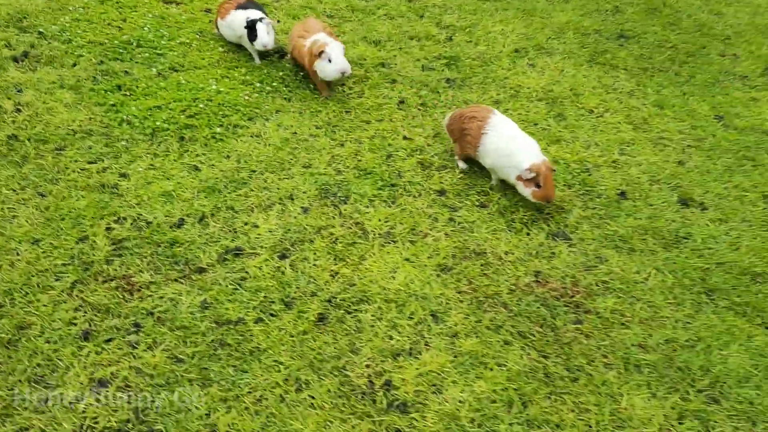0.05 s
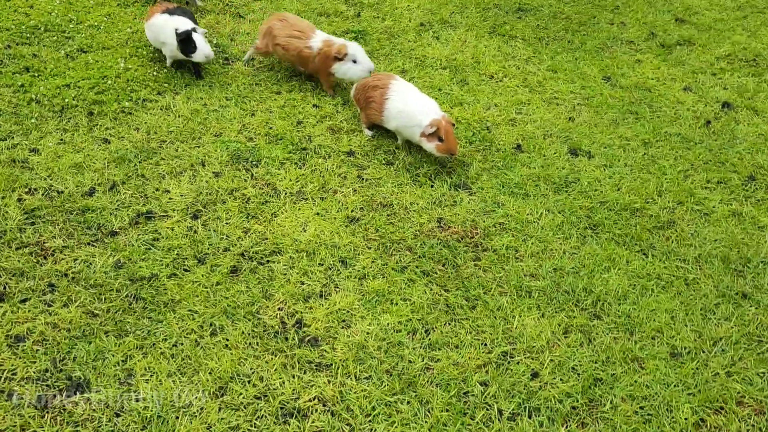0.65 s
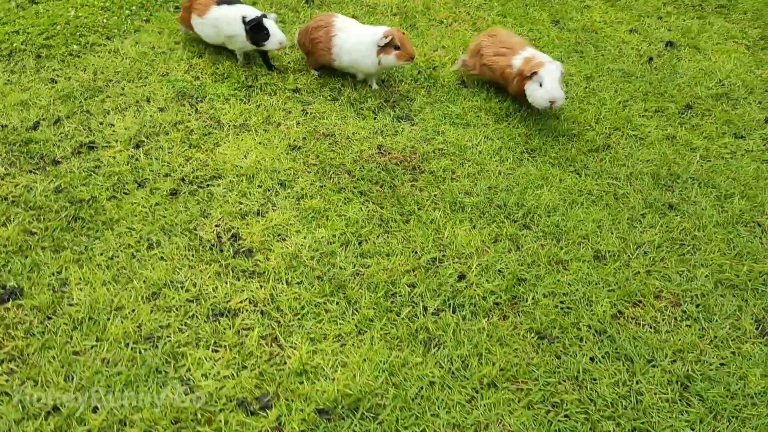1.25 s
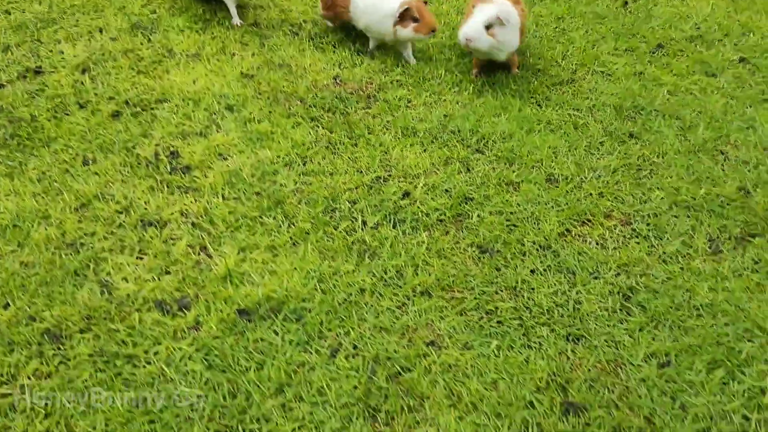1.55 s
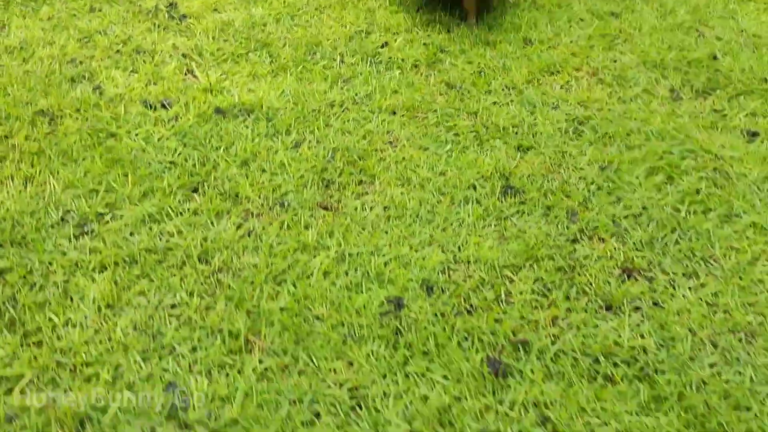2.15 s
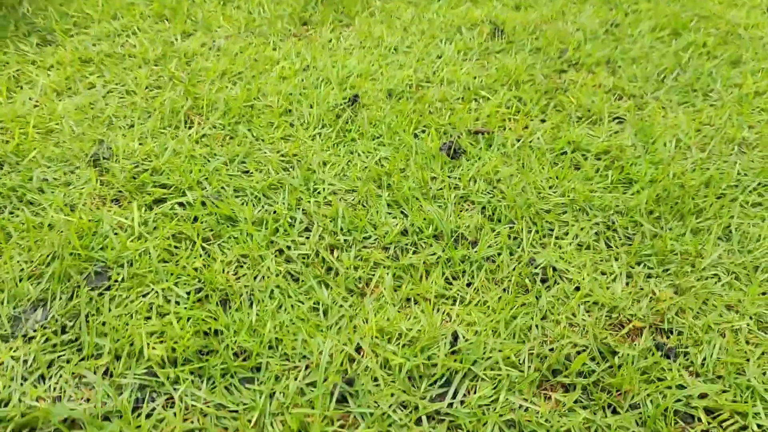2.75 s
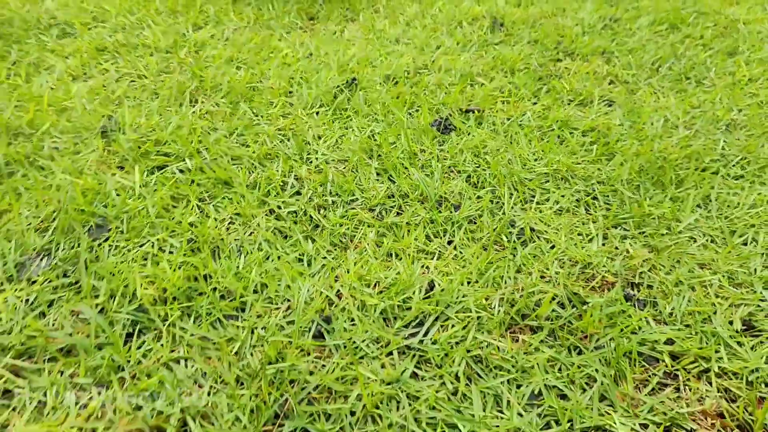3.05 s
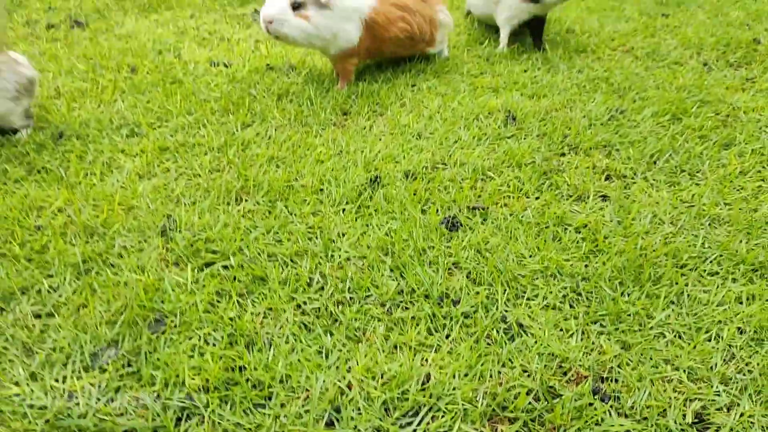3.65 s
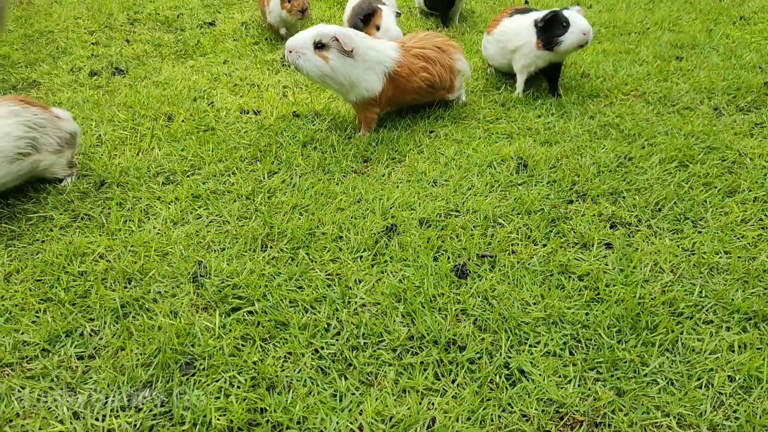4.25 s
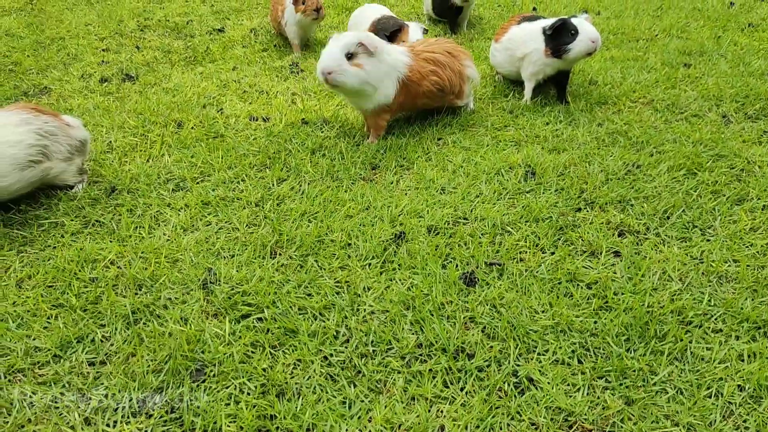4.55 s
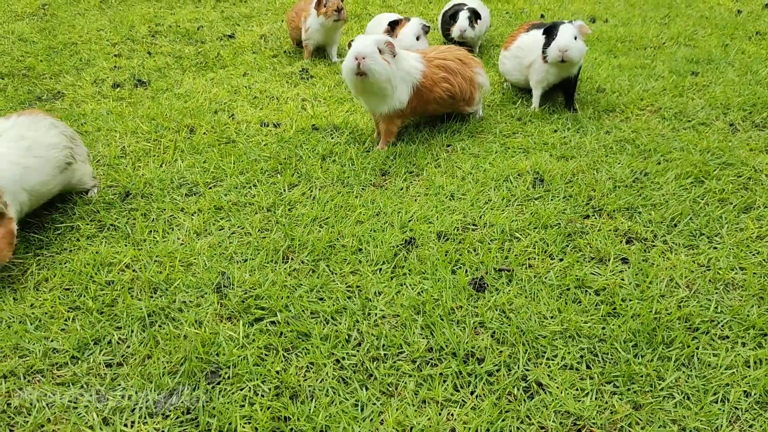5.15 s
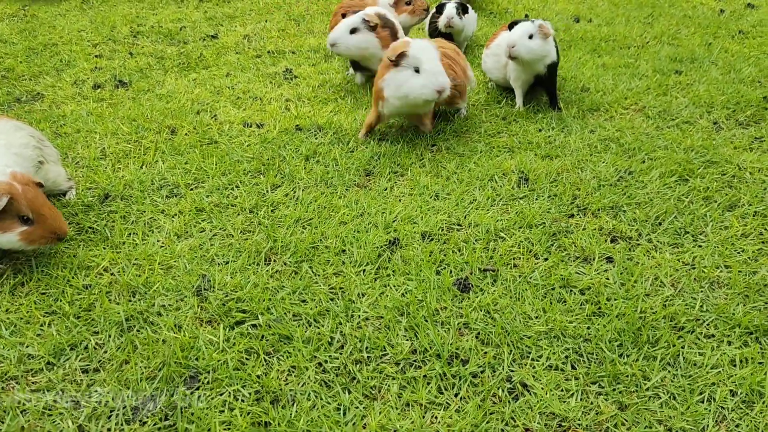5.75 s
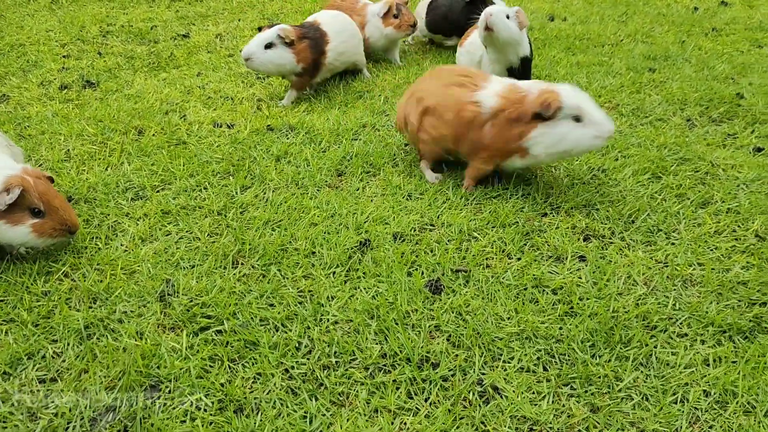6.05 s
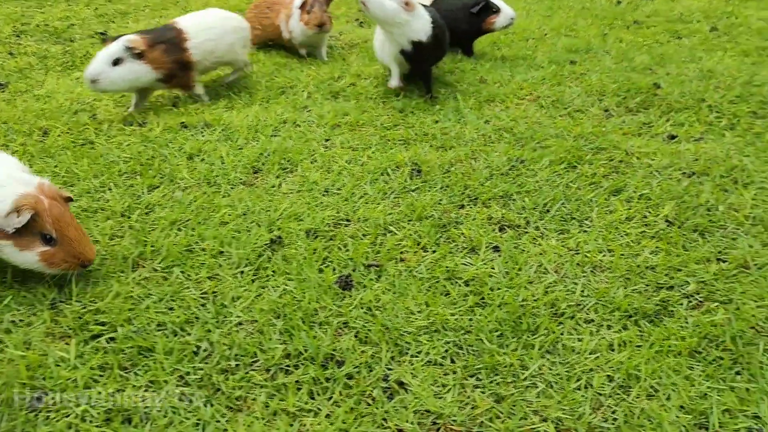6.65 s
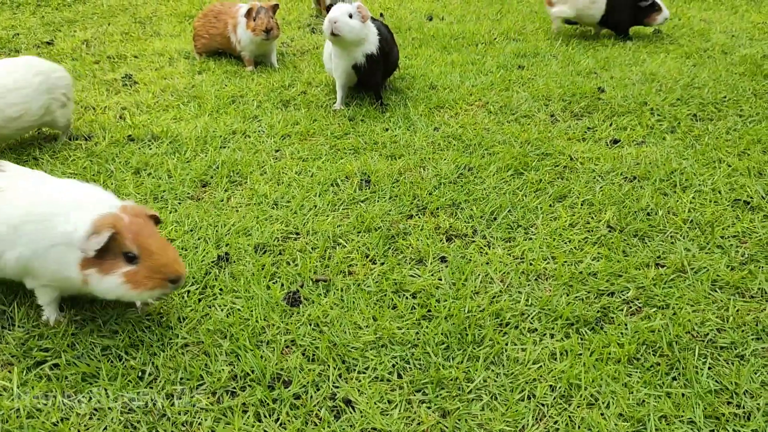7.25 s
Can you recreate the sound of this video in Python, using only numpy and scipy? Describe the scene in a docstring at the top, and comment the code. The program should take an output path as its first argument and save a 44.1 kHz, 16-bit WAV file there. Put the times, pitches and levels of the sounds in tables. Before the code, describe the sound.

In a yard with a faint, wavering machine hum, dry pellets rattle in a quick rhythm inside a plastic tub near the microphone. After about two seconds the tub is tipped and the pellets are stirred, with scattered clicks and hollow knocks. Short guinea pig squeaks and thin bird whistles echo lightly from a distance. A dull bump ends the handling, and grass rustles softly as the animals scurry over the lawn.

```python
"""A dry rattle, close by: a plastic tub of feed pellets is shaken about six times a second, then tipped
and rummaged, to call guinea pigs over a lawn. The pellets crackle on each other and drum on the hollow
tub, and fine pellet dust slides with a brief bright hiss. Raspy squeaks and thin bird whistles echo in
the yard, the grass hisses near the end as the animals run, and a low machine hum wavers under the air."""
import sys
import numpy as np
from scipy import signal
from scipy.fft import rfft, irfft
from scipy.io import wavfile
from scipy.ndimage import uniform_filter1d, minimum_filter1d

SR = 44100
rng = np.random.default_rng(int(sys.argv[2]) if len(sys.argv) > 2 else 0)


def log_audio(samples):
    """Write samples as a 16-bit WAV file to the path given in sys.argv[1]."""
    # one column per channel
    frames = np.atleast_2d(samples).T
    # limit to full scale, then quantise
    limited = np.clip(frames, -1, 1)
    pcm = np.round(limited * 32767).astype(np.int16)
    wavfile.write(sys.argv[1], SR, pcm)


N = 326781
T = np.arange(N) / SR

# Tone of the outdoor air. Each row: frequency in Hz, relative level in dB.
AIR_COLOUR = [(20, -9), (36, -4), (60, -8), (90, -4.5), (180, -9), (280, -19), (500, -22.5), (1350, -36.5),
              (2300, -27), (3100, -32), (4100, -31), (5800, -33.5), (7100, -28), (7700, -33), (8400, -27.5),
              (11000, -46), (15500, -56)]
# Fader ride of the machine hum. Each row: time in seconds, level in dB.
HUM_RIDE = [(0.0, -38.5), (0.31, -35), (1.5, -39), (1.81, -49), (2.18, -36), (2.92, -55.5), (3.01, -42),
            (3.26, -46), (3.38, -36.5), (3.98, -37.5), (4.04, -49.5), (4.59, -38), (5.56, -52.5),
            (5.61, -39.5), (7.4, -46.5)]
# Tone of sliding dust and brushed grass. Each row: frequency in Hz, relative level in dB.
HISS_COLOUR = [(1000, -27.5), (2000, -6.5), (3200, 3), (4400, 3), (6000, -0.5), (7000, -5.5), (8400, 3.5),
               (10000, -12), (12000, -14), (14000, -31)]
# Bright hisses: the first two are fine pellet dust sliding in the tub, the last two are runs through
# the grass. Each row: start and length in seconds, level in dB.
HISSES = [(2.345, 0.038, -32.5), (2.434, 0.26, -46.5), (6.248, 0.236, -47), (6.498, 0.5716, -37)]
# Bird whistles. Each row: start and length in seconds, start, middle and end pitch in Hz, level in dB.
BIRD_NOTES = [(2.801, 0.098, 5310, 6040, 6420, -43.5), (3.304, 0.0306, 3227, 2922, 2630, -42.5),
              (3.406, 0.046, 2707, 2744, 2746, -46), (3.816, 0.063, 5370, 6020, 6570, -42),
              (5.461, 0.02, 5380, 5860, 6080, -40.5), (5.62, 0.0633, 3850, 3830, 3664, -38.5),
              (5.697, 0.036, 5270, 5030, 4610, -44), (5.891, 0.0784, 5104, 4705, 4735, -44),
              (6.067, 0.053, 5000, 4850, 4015, -40.5), (6.312, 0.064, 5350, 4993, 4890, -40),
              (6.886, 0.083, 5900, 5764, 5860, -39.5)]
# Raspy squeaks. Each row: start and length in seconds, start and end pitch in Hz, level in dB.
SQUEAK_NOTES = [(2.858, 0.0758, 3136, 3118, -28), (2.934, 0.0837, 3260, 3504, -34),
                (3.809, 0.0495, 4576, 3788, -36), (3.849, 0.074, 3018, 3147, -30.5),
                (4.634, 0.0374, 3900, 3934, -40), (4.814, 0.0742, 3066, 3229, -31),
                (4.918, 0.0425, 3910, 3990, -41), (6.019, 0.023, 3243, 2670, -44),
                (6.199, 0.0293, 3990, 3845, -43.5), (6.779, 0.083, 3196, 3098, -31.5),
                (7.348, 0.082, 3090, 2990, -47)]
# Dull hand bumps on the tub. Each row: start in seconds, pitch in Hz, decay in seconds, level in dB.
HAND_BUMPS = [(5.652, 494.3, 0.0063, -17.5), (5.956, 535, 0.00596, -31.5), (6.028, 199, 0.0105, -27)]
# A soft creak of the plastic. Each row: start and length in seconds, pitch in Hz, level in dB.
TUB_CREAKS = [(2.353, 0.08, 640.6, -44.5)]
# How the tub is held. Each row: time and right-channel lag in seconds, open-mouth tone in dB.
TUB_POSE = [(0, 0.0002168, 2.5), (0.801, 0.000141, -55.5), (1.3, 0.0002834, -3), (2.0, 0.000236, -1.5),
            (3.1, 0.0003, 6), (4.2, .00037, -9), (5.2, 0.0002124, 2)]
# Resonances of the tub. Each row: frequency and bandwidth in Hz, relative level in dB.
TUB_MODES = [(394.7, 43.9, 0), (422.5, 45, 1), (493.7, 70.6, 4.5), (625, 34.8, -4), (781.7, 57.4, -5),
             (1062.8, 66, -12), (2007, 143, -13), (2422, 727, -11.5)]
# Tone of pellet on pellet. Each row: frequency in Hz, relative level in dB.
CRACKLE_COLOUR = [(300, -23.5), (600, 2.5), (1000, -1.5), (1400, -0.5), (1750, 3.5), (2100, 1.5), (2500, 3),
                  (3600, 1), (4600, -0.5), (6400, -5), (8400, 1.5), (9600, -9), (12300, -23), (15500, -29)]
# Shakes. Each row: landing time and flight in seconds, strength of the throw and its lead-in slide in dB.
TUB_SHAKES = [(0.107, 0.0209, -10.5, -32), (0.284, 0.0242, -11.5, -20), (.452, 0.0267, -11.5, -16.5),
              (0.597, 0.0217, -9, -22), (0.76, 0.021, -10.5, -22.5), (0.924, 0.01755, -4, -27.5),
              (1.119, 0.0189, -8.5, -19.5), (1.305, 0.0363, -13.5, -25), (1.482, 0.0241, -20, -27),
              (1.625, 0.0243, -14, -23.5), (1.815, 0.0352, -17, -32), (1.966, 0.0264, -16.5, -23),
              (2.102, 0.0093, -17.5, -27.5), (2.256, 0.0232, -23.5, -29.5)]
# The hand stirs the pellets. Each row: crest time and swell in seconds, strength in dB.
HAND_STIRS = [(2.39, 0.125, -47), (2.554, 0.0344, -37.5), (3.005, 0.015, -42), (3.081, 0.01586, -24),
              (3.208, 0.0876, -43), (3.937, 0.0083, -21.5), (3.97, 0.057, -32), (4.08, 0.0502, -25.5),
              (4.147, 0.0255, -17.5), (4.274, .065, -23), (4.275, 0.0148, -13), (4.426, 0.0343, -35.5),
              (4.68, 0.0864, -45.5), (4.774, 0.0529, -34), (5.097, 0.0535, -24), (5.22, 0.0577, -27.5),
              (5.37, 0.119, -40.5), (5.509, 0.02844, -34.5), (5.64, 0.048, -42.5)]
# Single hard pellet hits. Each row: start in seconds, relative levels of crack and tub knock in dB.
HARD_HITS = [(0.0111, -10, -21), (0.0702, -8.5, -21), (0.1235, 2, -17.5), (0.2538, -14.5, -11),
             (0.5797, 1.5, -28.5), (0.9074, -2.5, -28.5), (0.9408, -0.5, -13.5), (1.0461, -7, -10),
             (1.4782, -2.5, -30.5), (1.6, -10, -28), (2.0857, -13, -19), (2.1104, -9.5, -11.5),
             (2.237, -15, -32), (2.3119, -20, -25.5), (2.5724, -11.5, -20.5), (2.97, -14.5, -49),
             (3.075, -11.5, -20.5), (3.1148, -15, -48), (3.239, -20, -24.5), (4.1259, -11, -20.5),
             (4.1438, 0.5, -17), (4.1801, -15, -19), (4.2764, -3.5, -18.5), (4.3034, -12, -28.5),
             (4.6962, -14, -23.5), (4.8334, -16.5, -42.5), (4.9704, -25.5, -24), (5.0941, -15.5, -15.5),
             (5.2106, -10.5, -25.5), (5.2208, -3, -29), (5.244, -12, -26), (5.4377, -17.5, -40),
             (5.5282, -21.5, -26)]

YARD_DECAY_S = 0.117


def undb(db):
    """Decibels to gain."""
    return 10 ** (np.asarray(db) / 20)


def unit(x):
    """Scale to rms 1."""
    return x / np.sqrt(np.mean(x ** 2))


def pan(db):
    """Channel gains for a left minus right level."""
    return undb(np.array([[db], [-db]]) / 2)


def add(track, start_s, sound):
    """Mix a sound into a track."""
    part = track[int(start_s * SR):][:len(sound)]
    part += sound[:len(part)]


def walk(rate_hz):
    """A smooth random wobble of rms 1."""
    hold = int(SR / rate_hz)
    steps = np.repeat(rng.standard_normal(N // hold + 1), hold)
    return unit(uniform_filter1d(uniform_filter1d(steps, hold), hold)[:N])


def note(length_s):
    """Progress 0-1 through a note, and its rounded envelope."""
    progress = np.linspace(0, 1, int(length_s * SR))
    return progress, np.sqrt(2 * np.abs(np.sin(np.pi * progress)))


def ring(x, response):
    """Pass x through an impulse response scaled to unit energy."""
    response = response / np.sqrt(np.sum(response ** 2, axis=-1, keepdims=True))
    return signal.fftconvolve(np.atleast_2d(x), np.atleast_2d(response), axes=-1)[:, :N]


def colour(x, points, size=1024):
    """Minimum-phase EQ with the given (Hz, dB) outline."""
    hz, db = np.transpose(points)
    gain = undb(np.interp(np.log(np.fft.rfftfreq(size, 1 / SR) + 1), np.log(hz), db))
    cepstrum = irfft(np.log(gain))[:size // 2]
    cepstrum[1:] *= 2
    return ring(x, irfft(np.exp(rfft(cepstrum, size))))


def band(x, centre_hz, width_hz):
    """One resonance, gain 1 at the centre."""
    return signal.lfilter(*signal.iirpeak(centre_hz, centre_hz / width_hz, fs=SR), x)


def flicker(x, centres_hz, rate_hz, depth_db):
    """Let each band rise and fall on its own."""
    for hz in centres_hz:
        gain = undb(depth_db * (walk(rate_hz) - 0.4372))
        x = x + (gain - 1) * band(x, hz, width_hz=hz / 4)
    return x


def echoes(x, decay_s, db):
    """A dense reverb tail, different on each side."""
    t = T[:SR // 2]
    return undb(db) * ring(x, rng.standard_normal((2, len(t))) * np.exp(-t / decay_s))


def far(x):
    """A distant call arrives mostly by way of walls and hedges."""
    return undb(-7) * x + echoes(x, decay_s=.008, db=-5) + echoes(x, YARD_DECAY_S, db=-4.5)


def pose():
    """The tub's right-channel lag in seconds and open-mouth tone in dB, at every sample."""
    times, lag_s, mouth_db = np.transpose(TUB_POSE)
    return np.interp(T, times, lag_s), np.interp(T, times, mouth_db)


def collisions(per_s, spread_db, scatter_s):
    """Random clicks of rms 1; each comes from its own spot, so its stereo lag differs."""
    chance, strength, place = rng.random(N), rng.standard_normal(N), rng.standard_normal(N)
    left = np.flatnonzero(chance < per_s / SR)
    clicks = rng.choice([-1, 1], N)[left] * undb(spread_db * np.minimum(strength[left], 2))
    lag_s, _ = pose()
    lag = np.rint((lag_s + scatter_s * place)[left] * SR).astype(int)
    right = np.clip(left + lag, 0, N - 1)
    return unit(np.array([np.bincount(left, clicks, N), np.bincount(right, clicks, N)]))


def machine_hum(pitch_hz=53):
    """A low machine tone, wavering in pitch and level."""
    phase = 2 * np.pi * np.cumsum(pitch_hz + 0.685 * walk(13)) / SR
    level_db = np.interp(T, *np.transpose(HUM_RIDE)) + 2.66 * walk(12)
    return undb(level_db) * unit(np.sin(phase))


def outdoor_air(level_db=-41.5):
    """A soft bed of noise, narrow in the bass and wide in the treble."""
    mid, side = colour(rng.standard_normal((2, N)), AIR_COLOUR, size=8192)
    side_treble = signal.sosfilt(signal.butter(1, 700, "high", fs=SR, output="sos"), side)
    side = undb(-1) * side_treble + 0.163 * side
    return undb(level_db + 0.91 * walk(3.6)) * np.array([mid + side, mid - side])


def hiss_level(attack_s=0.0345, release_s=0.0572):
    """Each hiss starts quickly, holds and dies away."""
    level = np.zeros(N)
    for start, length, db in HISSES:
        attack = np.clip((T - start) / attack_s, 0, 1)
        release = np.exp(-np.maximum(T - start - length, 0) / release_s)
        level += undb(db) * attack * release
    return level


def dust_and_grass(step_db=-53, steps_from_s=4.2):
    """Countless tiny contacts hiss: first dust sliding in the tub, later grass on fur and scuffing feet."""
    grains = colour(collisions(per_s=6900, spread_db=1, scatter_s=.0004), HISS_COLOUR)
    grains = flicker(grains, np.geomspace(2500, 9000, num=6), rate_hz=30, depth_db=2.6)
    steps = np.maximum(walk(24), 0) ** 2 * (T > steps_from_s)
    scuffs = undb(step_db) * steps * band(grains, centre_hz=3250, width_hz=2300)
    hiss = grains * hiss_level() * undb(2.13 * walk(30))
    return (hiss + scuffs) * pan(-4)


def bird_whistles(waver=0.0185):
    """Far birds: thin, slightly unsteady glides, washed by the yard."""
    out, wobble = np.zeros(N), walk(350)
    for start, length, start_hz, middle_hz, end_hz, db in BIRD_NOTES:
        progress, envelope = note(length)
        hz = np.polyval(np.polyfit([0, .5, 1], [start_hz, middle_hz, end_hz], 2), progress)
        hz *= 1 + waver * wobble[int(start * SR):][:len(hz)]
        add(out, start, undb(db) * envelope * np.sin(2 * np.pi * np.cumsum(hz) / SR))
    return far(out)


def squeaks(trill_hz=48, under_db=-14, over_db=-13):
    """A fast uneven trill roughens each distant squeak; weaker tones sit below and above it."""
    out, rasp = np.zeros(N), walk(600)
    for start, length, start_hz, end_hz, db in SQUEAK_NOTES:
        progress, envelope = note(length)
        trill = np.sin(2 * np.pi * trill_hz * length * progress)
        waver_hz = 120 * trill + 250 * np.roll(rasp, -int(start * SR))[:len(trill)]
        phase = 2 * np.pi * np.cumsum(start_hz + (end_hz - start_hz) * progress + waver_hz) / SR
        tones = np.sin(phase) + undb(under_db) * np.sin(.51 * phase)
        tones += undb(over_db) * np.sin(1.38 * phase)
        add(out, start, undb(db) * envelope * (1 + 0.18 * trill) * tones)
    return far(out)


def handling():
    """The hand bumps the tub, and once the plastic creaks."""
    out, t = np.zeros(N), T[:SR // 8]
    for start, hz, decay_s, db in HAND_BUMPS:
        envelope = 2 * t / decay_s * np.exp(1 - 2 * t / decay_s)
        add(out, start, undb(db) * envelope * np.sin(2 * np.pi * hz * t))
    for start, length, hz, db in TUB_CREAKS:
        _, envelope = note(length)
        phase = 2 * np.pi * np.cumsum(hz * (1 + 0.02 * walk(59)[:len(envelope)])) / SR
        add(out, start, undb(db) * envelope * (np.sin(2 * phase) + 1.19 * np.sin(phase)))
    return out + echoes(out, decay_s=0.0143, db=-17)


def surges(settle_s=0.01901, slide_share=0.542, slide_rise_s=0.0388, slide_fall_s=0.0296):
    """Every move of the pellet mass: stirs, throws and the slides back between throws."""
    moves = [(crest, swell, swell, db) for crest, swell, db in HAND_STIRS]
    previous = 0
    for landing, flight, throw_db, slide_db in TUB_SHAKES:
        slide_crest = previous + slide_share * (landing - previous)
        moves.append((slide_crest, slide_rise_s, slide_fall_s, slide_db))
        moves.append((landing, flight, settle_s, throw_db))
        previous = landing
    return moves


def surge_level(growth, shape):
    """The pellets gather speed, land and settle; growth is dB of level per dB of strength."""
    power = np.zeros(N)
    for crest, rise, fall, db in surges():
        near = slice(max(0, int((crest - 3 * rise) * SR)), int((crest + 3 * fall) * SR))
        t = T[near] - crest
        from_crest = np.abs(t / np.where(t < 0, rise, fall))
        power[near] += undb(growth * db) ** 2 * np.exp(-2 * from_crest ** shape)
    return np.sqrt(power)


def knocks():
    """Each hard hit is one blow on the tub wall, a touch later on the right."""
    out = np.zeros((2, N))
    lag_s, _ = pose()
    for start, _, db in HARD_HITS:
        add(out[0], start, undb([db]))
        add(out[1], start + lag_s[int(start * SR)], undb([db]))
    return out


def drumming(patter_db=-7.5, knock_db=22):
    """Pellets that reach the wall ring the tub, giving the rattle its body."""
    patter = collisions(per_s=1200, spread_db=2, scatter_s=.00006)
    blows = undb(patter_db) * surge_level(growth=0.6618, shape=1.162) * patter
    blows += undb(knock_db) * knocks()
    t = T[:SR // 10]
    body = np.zeros(len(t))
    for k, (hz, width, db) in enumerate(TUB_MODES):
        envelope = undb(db) * width * np.exp(-np.pi * width * t)
        body += (-1) ** k * envelope * np.sin(2 * np.pi * hz * t)  # neighbours swing in opposite senses
    # a small tub radiates little below its lowest mode
    body = signal.sosfilt(signal.butter(4, 270, "high", fs=SR, output="sos"), body)
    return ring(blows, body) * pan(2.15)


def chatter_level(decay_s=.0028):
    """Each hard hit sets off a brief chatter among its neighbours."""
    level, t = np.zeros(N), T[:SR // 20]
    for start, db, _ in HARD_HITS:
        add(level, start, undb(db) * np.exp(-t / decay_s))
    return level


def tub_reflections(clicks, decay_s=.0014, db=-4):
    """Inside the tub every click gets its own short, wide noise tail."""
    keep = np.exp(-2 / (decay_s * SR))
    envelope = np.sqrt(signal.lfilter([1 - keep], [1, -keep], clicks ** 2))
    return undb(db) * envelope * rng.standard_normal((2, N))


def crackling(patter_db=-0.9739, crack_db=-6.5):
    """Pellet on pellet: a dense patter of shifting colour with a few loud cracks."""
    patter = collisions(per_s=2500, spread_db=6.2, scatter_s=.00004)
    chatter = collisions(per_s=9000, spread_db=4, scatter_s=.00004)
    clicks = undb(patter_db) * surge_level(growth=0.9605, shape=1.159) * patter
    clicks += undb(crack_db) * chatter_level() * chatter
    clicks += tub_reflections(clicks)
    crackle = colour(clicks, CRACKLE_COLOUR)
    crackle = flicker(crackle, np.geomspace(1600, 8400, num=7), rate_hz=110, depth_db=4)
    # the open mouth adds a broad hollow tone and a narrow ring
    mouth = band(crackle, centre_hz=1365, width_hz=1490) + band(crackle, centre_hz=2431, width_hz=134)
    _, mouth_db = pose()
    return crackle + undb(mouth_db) * mouth


def pellets():
    """The tub at arm's length, with a trace of yard: gentle moves mostly drum, hard ones crackle."""
    tub = crackling() + drumming()
    return tub + echoes(tub, YARD_DECAY_S, db=-27)


def scene():
    """The tub close by, the animals and the yard beyond."""
    action = pellets() + handling() + squeaks() + bird_whistles() + dust_and_grass()
    bed = (machine_hum() + outdoor_air()) * pan(-1.75)
    return action + bed


def record(dry):
    """A quick limiter holds down the tallest peaks, and the top is rolled off."""
    ceiling, top_hz = .9, 15500
    gain = np.minimum(1, ceiling / (np.abs(dry).max(axis=0) + 1e-9))
    gain = uniform_filter1d(minimum_filter1d(gain, size=129), size=129)
    return signal.sosfilt(signal.ellip(8, .2, 70, top_hz, fs=SR, output="sos"), dry * gain)


dry = scene()
out = record(dry)
log_audio(out)
```